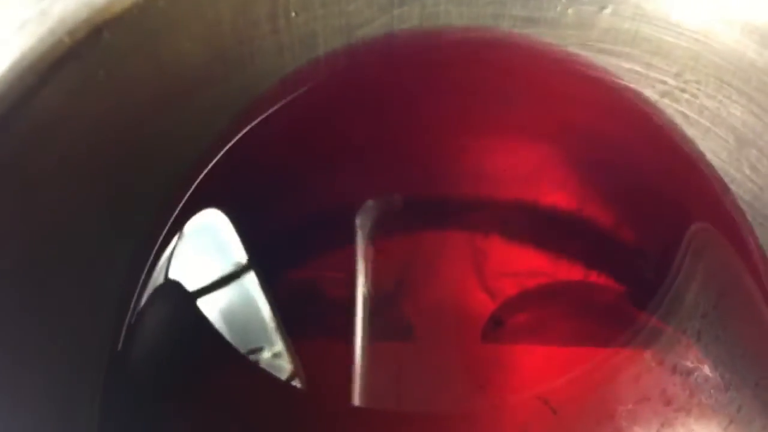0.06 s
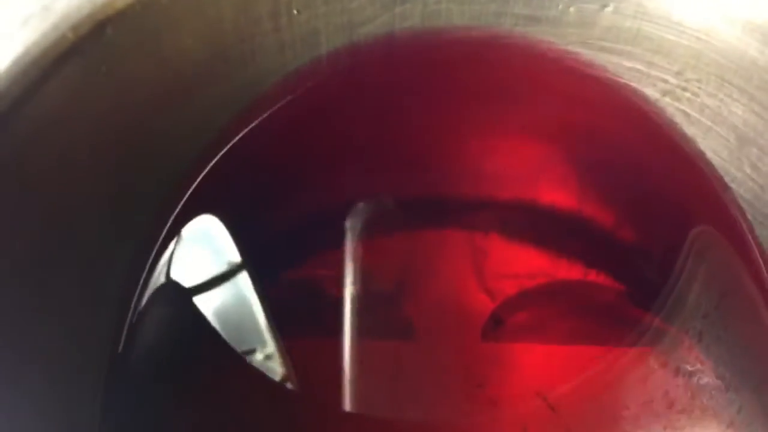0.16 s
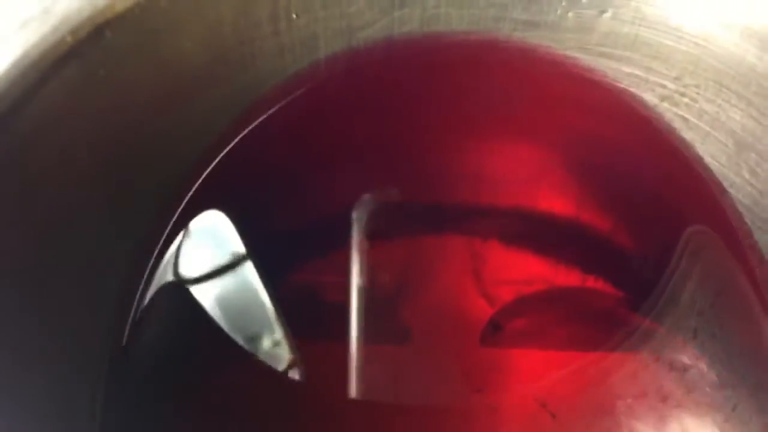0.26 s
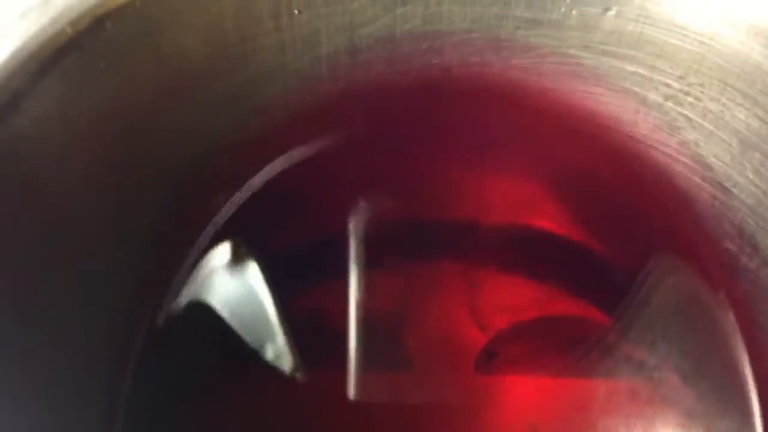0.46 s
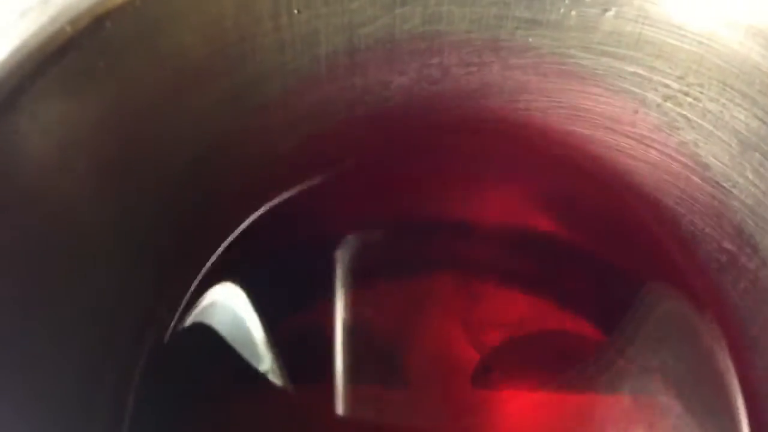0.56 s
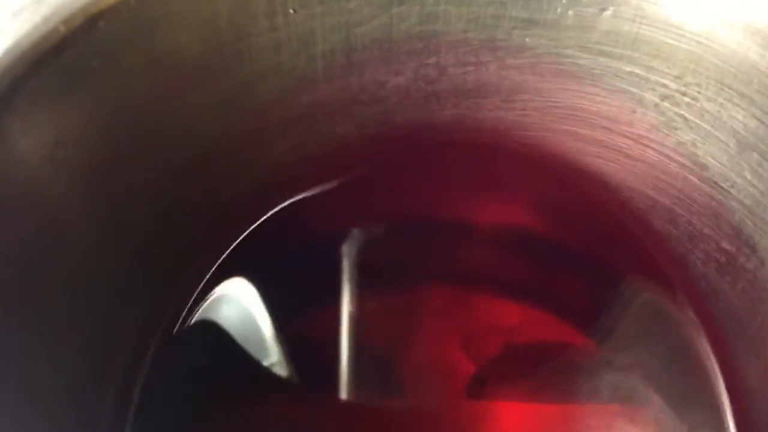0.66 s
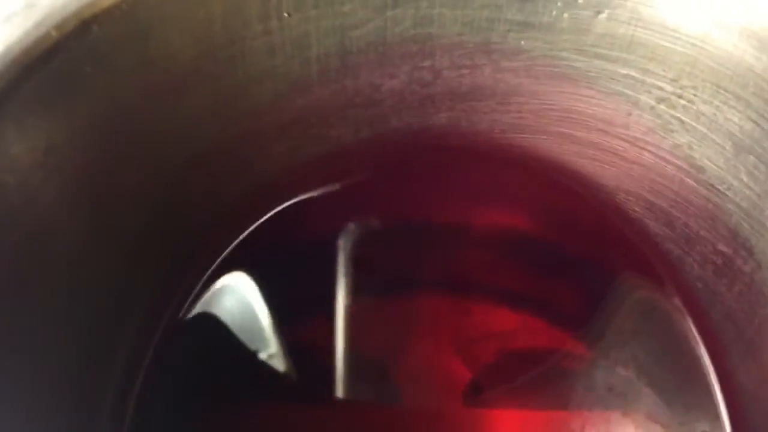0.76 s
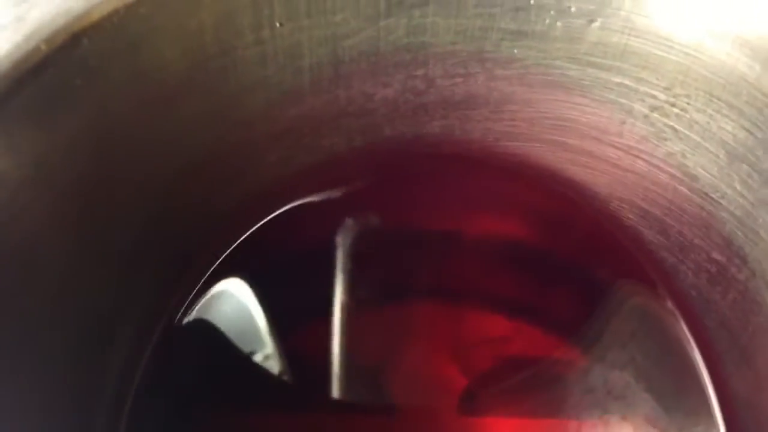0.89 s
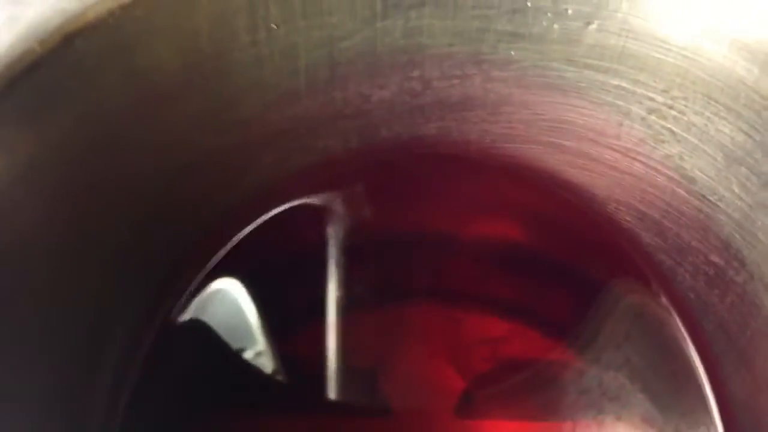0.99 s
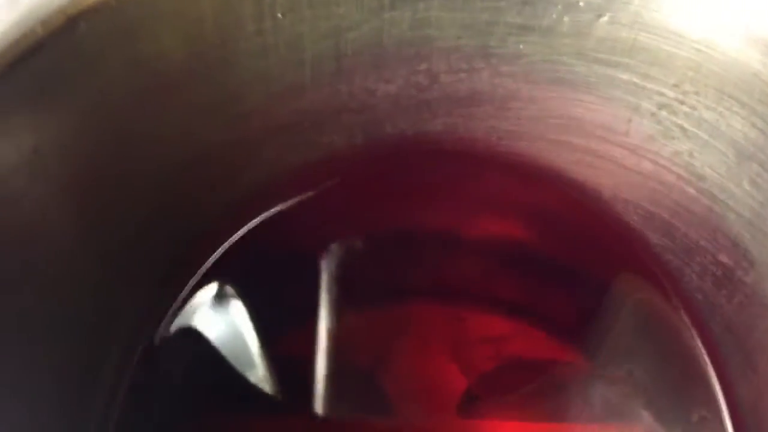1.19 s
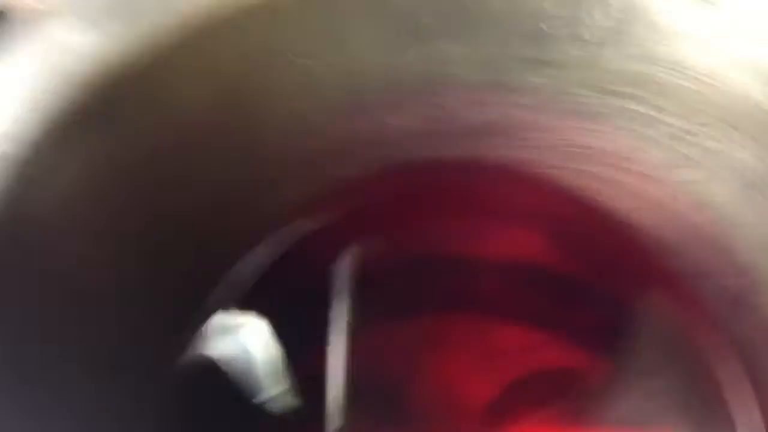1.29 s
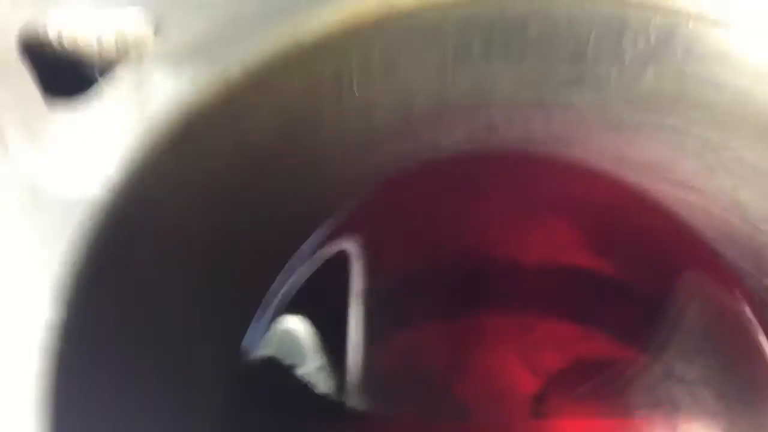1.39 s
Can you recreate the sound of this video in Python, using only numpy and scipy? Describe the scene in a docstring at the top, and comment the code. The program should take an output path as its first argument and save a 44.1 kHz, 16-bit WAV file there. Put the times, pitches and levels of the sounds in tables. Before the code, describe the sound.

A piston knocks and scrapes in an oiled metal cylinder, close up.

```python
"""A workshop, one microphone close above the bore of an oiled metal cylinder.
A piston is worked up and down: it rattles and knocks at each turn of the stroke, and the block thuds
on its support. Between the turns the rings scrape and hiss along the wall, and air squeaks and
bubbles through the oil. Behind it all lie a low rumble and a wavering hum."""
import sys
import numpy as np
from scipy import signal
from scipy.fft import rfft, irfft
from scipy.io import wavfile

SR = 44100
rng = np.random.default_rng(int(sys.argv[2]) if len(sys.argv) > 2 else 0)


def waveform_to_disk(signal):
    """Save audio, clipped to [-1, 1], as 16-bit WAV at the path in sys.argv[1]."""
    frames = np.transpose(np.atleast_2d(signal))
    scaled = np.clip(frames, -1, 1) * 32767
    samples = np.round(scaled).astype(np.int16)
    wavfile.write(sys.argv[1], SR, samples)


N = 63945
T = np.arange(N) / SR

# Piston blows and one hollow bubble pop in the oil (at 0.4685 s), close up:
# t/s, hollow body/dB, bore ring/dB, metal edge/dB, oily crunch/dB
KNOCKS_AND_POP = [(.164, -63, -55, -67, -57), (0.1753, -50, -49, -78, -48.5),
                  (0.1807, -52, -42.5, -78, -52.5), (.1945, -50.5, -52, -74, -48),
                  (.1995, -57, -53, -74, -43), (0.2156, -42.5, -52, -54, -55),
                  (0.2198, -20.5, -20.5, -36, -44), (.2293, -36, -41, -51, -56),
                  (0.233, -39, -36, -59, -58), (.2435, -39, -67, -80, -64), (.4685, -49, -58, -72, -64),
                  (.971, -85, -58, -64, -66), (1.0257, -68, -45.5, -49.5, -46.5),
                  (1.0305, -59, -58, -51, -55), (1.0363, -71, -35, -64, -49.5),
                  (1.0495, -78, -32.5, -54, -46), (1.0645, -68, -53, -72, -59),
                  (1.0745, -53.5, -46, -72, -45.5), (1.085, -64, -61, -63, -51.5),
                  (1.095, -67, -59, -82, -58)]
# Modes of body, bore and metal edge: f/Hz, relative level/dB, time to peak/s
BODY_MODES = [(650, -17, 0.00274), (908, 2, 0.002473), (1088, -11, 0.00395), (1560, -25, 0.0029),
              (2598, -10, 0.00307)]
BORE_MODES = [(1990, -16, 0.00306), (2162, -4, .0042), (2299, -6.5, 0.0043)]
EDGE_MODES = [(3210, -0.5, .0014), (3550, -0.5, 0.001328)]
# The block ringing on after body and bore are excited: f/Hz, relative level/dB, T60/s
BODY_TAIL = [(908, -29, .13), (1044, -35, .4), (1119, -28, .11), (1212, -37, .11), (1439, -46, .27),
             (1543, -49, .17), (2547, -31, .1), (2635, -35, .13), (8425, -50, .09)]
BORE_TAIL = [(1893, -36, .11), (2001, -35, .11), (2135, -26, .11), (2270, -33, .2)]
# Spectra of crushed oil film and of the tick of bare metal: f/Hz, relative density/dB
CRUNCH_SPECTRUM = [(20, -22), (400, -13.5), (650, 1), (800, -3.5), (1300, 2), (1650, -3.5), (1950, 2),
                   (2400, -10), (2700, -13), (3200, -11.5), (3700, -26), (4300, -24), (5800, -41),
                   (7000, -34), (16000, -45)]
TICK_SPECTRUM = [(20, -11), (3000, 6.5), (4500, -4), (5200, 7), (5500, -10), (5850, 2), (6300, -18),
                 (7200, -2), (7700, 4.5), (8200, -7.5), (10000, -14), (11000, -7), (11550, 3.5),
                 (12200, -10), (12900, -6), (13600, -11), (14500, -14), (16000, -21)]
def piston_knocks_and_pop():
    """Piston blows and one bubble pop sound body, bore and edge, with an oily crunch and a tick."""
    body = swelling(BODY_MODES) + amp(4) * lingering(BODY_TAIL)
    bore = swelling(BORE_MODES) + amp(4) * lingering(BORE_TAIL)
    edge = swelling(EDGE_MODES)
    crunch = colour(friction(), CRUNCH_SPECTRUM)
    tick = colour(rng.standard_normal(N), TICK_SPECTRUM)
    hardest_db = max(event[1] for event in KNOCKS_AND_POP)
    out = np.zeros(N)
    for start, body_db, bore_db, edge_db, crunch_db in KNOCKS_AND_POP:
        add(out, start, amp(body_db) * body + amp(bore_db) * bore + amp(edge_db) * edge)
        out += amp(crunch_db) * crunch * burst(start, rise_s=0.003, decay_s=0.0079)
        tick_db = -40.5 + 1.5 * (body_db - hardest_db)  # soft events barely tick
        out += amp(tick_db) * tick * burst(start, rise_s=0.00075, decay_s=0.0057)
    return out


# Course of ring scrape, upper bore resonance (strongest late in a stroke) and oil hiss: t/s, level/dB
SCRAPE_LEVELS = [(0, -90), (.32, -77), (.36, -63), (.39, -59), (.42, -54), (.5, -51.5), (.57, -50),
                 (.68, -50.5), (.75, -52.5), (.81, -55.5), (.845, -71), (.87, -88), (1.21, -80.5),
                 (1.243, -69), (1.26, -58), (1.32, -52.5), (1.37, -49), (1.45, -52)]
SING_LEVELS = [(.5, -100), (.6, -78), (.67, -57.5), (.76, -74), (.81, -56.5), (.87, -100), (1.22, -100),
               (1.28, -60), (1.45, -67)]
HISS_LEVELS = [(0, -100), (.33, -89), (.42, -71.5), (.5, -68), (.61, -66.5), (.7, -65.5), (.8, -74),
               (.86, -85), (1.24, -88), (1.27, -75), (1.295, -74.5), (1.328, -67.5), (1.35, -56),
               (1.385, -53), (1.402, -57.5), (1.435, -68), (1.447, -60.5)]
# Their spectra just above the bore: f/Hz, relative density/dB
SCRAPE_SPECTRUM = [(20, -45), (400, -44), (750, -24.5), (930, -22.5), (1200, -19.5), (1450, -30),
                   (1800, -19), (2030, -20.5), (2160, 1.5), (2300, -6.5), (2480, -19), (2700, -13.5),
                   (2900, -20.5), (3170, -13), (3750, -25), (4350, -25.5), (4600, -26), (5000, -46),
                   (5400, -31), (5880, -32), (6300, -41), (9000, -58), (20000, -64)]
SING_SPECTRUM = [(20, -74), (2800, -24), (3080, -10.5), (3170, -1), (3260, -31), (3600, -29), (20000, -83)]
HISS_SPECTRUM = [(20, -27), (350, 2), (700, -0.5), (1500, -18), (4000, -3), (5100, -6.5), (5900, -0.5),
                 (6700, -1), (7400, -1), (8000, -4.5), (8600, 0), (10600, -6.5), (11700, 2.5), (12600, -2),
                 (14000, 1.5), (16000, -6.5)]
# The rings catch and slip: t/s, gritty hiss/dB, bore ring/dB
CATCHES = [(.494, -78, -44.5), (.558, -78, -41), (0.602, -57, -52.5), (.662, -76, -47), (.69, -63, -71),
           (.819, -71, -74), (1.256, -78, -48.5), (1.267, -67, -56), (1.275, -75, -50), (1.307, -78, -44.5),
           (1.363, -66, -46), (1.383, -62, -56), (1.443, -62, -53)]
def piston_rings():
    """Sliding rings excite the bore, catching and slipping, while the oil film hisses."""
    judder = amp(1.05 * wander(rate_hz=23))
    scrape = colour(friction(), SCRAPE_SPECTRUM) * level(SCRAPE_LEVELS) * judder
    sing = colour(friction(), SING_SPECTRUM) * level(SING_LEVELS)
    grit, slips = np.zeros(N), np.zeros(N)
    for start, grit_db, bore_db in CATCHES:
        grit += amp(grit_db) * burst(start, rise_s=0.00075, decay_s=0.0036)
        add(slips, start, amp(bore_db) * ping(hz=2195, peak_s=0.0055))
    flicker = amp(1.1 * wander(rate_hz=50))
    hiss = colour(friction(), HISS_SPECTRUM) * (level(HISS_LEVELS) * flicker + grit)
    return scrape + sing + slips + hiss


# Thuds from under the cylinder: t/s, level/dB, f/Hz, overtone level/dB
BLOCK_THUDS = [(.001, -54.5, 74, -56.5), (.097, -52, 79.4, -53), (.222, -44, 66.4, -40),
               (.287, -43, 79.4, -56), (0.511, -63, 81, -55.5), (0.941, -44, 77, -59),
               (1.071, -40, 68, -44.5), (1.095, -64, 66.8, -43.5), (1.335, -50, 79, -48.5)]
def block_thuds():
    """The block rocks on its support: a low note with two overtones."""
    out, peak_s = np.zeros(N), 0.0189
    for start, db, hz, overtone_db in BLOCK_THUDS:
        overtones = ping(2.023 * hz, peak_s) + amp(-13) * ping(3 * hz, peak_s)
        add(out, start, amp(db) * ping(hz, peak_s) + amp(overtone_db) * overtones)
    return out


# Thin squeaks, one path of points each: t/s, f/Hz, level/dB, roughness/fraction of pitch
SQUEAK_PATHS = [
    [(.162, 2750, -70, 0.07), (.168, 2716, -64, 0), (.192, 2690, -80, .03)],
    [(.36, 1021, -80, 0.15), (.42, 980, -65, 0.05), (.51, 946, -67, 0.09), (.62, 890, -80, 0.18)],
    [(.385, 3640, -80, 0.08), (.402, 4150, -62, 0.01), (.422, 4230, -67, 0.02), (.442, 4130, -51.5, 0),
     (.453, 3500, -53, 0), (.468, 3200, -82, 0.16)],
    [(1.018, 5780, -80, 0.08), (1.028, 5680, -69, 0.03), (1.04, 5500, -83, 0)],
    [(1.405, 5500, -80, 0.18), (1.425, 4900, -65, 0.1), (1.438, 4250, -57, 0.1), (1.455, 3690, -55, 0.09)],
]
# Bubbles in the oil: t/s, level/dB, f/Hz
OIL_BUBBLES = [(.4695, -48.5, 489), (1.0345, -43.5, 650), (1.36, -56.5, 494)]
def air_through_oil():
    """Air squeezes past the rings in gliding squeaks and a few bubbles, and the air column in the bore sounds a
    slow falling tone as the piston descends."""
    out = np.zeros(N)
    for path in SQUEAK_PATHS:
        times, hz, db, roughness = np.transpose(path)
        rasp = np.interp(T, times, roughness) * wander(rate_hz=690)
        waver = 0.0071 * wander(rate_hz=250)
        pitch = np.interp(T, times, hz) * (1 + rasp + waver)
        envelope = np.interp(T, times, amp(db), left=0, right=0)
        out += np.sqrt(2) * envelope * tone(pitch)
    for start, db, hz in OIL_BUBBLES:
        add(out, start, amp(db) * ping(hz, peak_s=3.19 / hz))
    return out


# Room tone behind the cylinder: f/Hz, relative density/dB
RUMBLE_SPECTRUM = [(10, -41), (25, -24), (45, -11), (65, 2.5), (80, 2), (105, -3.5), (145, -2.5),
                   (200, -13.5), (250, -22), (400, -25.5), (620, -24), (800, -31.5), (2000, -35.5),
                   (5000, -40), (9500, -44), (10500, -48), (12000, -46), (16000, -49.5)]
def workshop():
    """The background is a low rumble with a wavering hum."""
    hum = unit(tone(hz=80.5 + 4 * wander(rate_hz=7.7)))
    rumble = colour(rng.standard_normal(N), RUMBLE_SPECTRUM)
    return amp(-54.5) * rumble + amp(-58.5) * hum


def room(x, tail_db=-14, t60_s=0.14, delay_s=0.007):
    """Nearby surfaces send a short, dense tail to the microphone after the direct sound."""
    t = T[:SR // 3]
    tail = rng.standard_normal(len(t)) * amp(-60 * t / t60_s) * (t > delay_s)
    return x + amp(tail_db) * signal.fftconvolve(x, tail / np.linalg.norm(tail))[:N]


def friction(slips_per_s=1800, spread_db=2, slip_share=0.34):
    """Tiny slips of uneven size over a smooth rub."""
    sizes = rng.standard_normal(N) * amp(spread_db * np.minimum(rng.exponential(1, N), 4))
    slips = sizes * (rng.random(N) < slips_per_s / SR)
    return np.sqrt(slip_share) * unit(slips) + np.sqrt(1 - slip_share) * rng.standard_normal(N)


def ping(hz, peak_s):
    """A damped resonance that swells to its peak and dies."""
    t = T[:SR // 4]
    age = t / peak_s
    return (age * np.exp(1 - age)) ** 2.05 * np.sin(2 * np.pi * hz * (t - peak_s))


def swelling(modes):
    """Modes excited together swell and die."""
    return sum(amp(db) * ping(hz, peak_s) for hz, db, peak_s in modes)


def lingering(modes):
    """Modes start at once and fade exponentially."""
    t = T[:SR // 4]
    return sum(amp(db - 60 * t / t60) * np.sin(2 * np.pi * hz * t) for hz, db, t60 in modes)


def burst(start, rise_s, decay_s):
    """An envelope that swells quickly and dies away."""
    t = np.maximum(T - start, 0)
    return (1 - np.exp(-t / rise_s)) * np.exp(-t / decay_s)


def colour(x, spectrum):
    """Filters x by a spectrum, at unit power."""
    hz, db = np.transpose(spectrum)
    gain = amp(np.interp(np.log(np.fft.rfftfreq(N, 1 / SR) + 1), np.log(hz), db))
    return unit(irfft(rfft(x) * gain, N))


def wander(rate_hz):
    """Smooth random drift of unit power."""
    lowpass = np.exp(-(np.fft.rfftfreq(N, 1 / SR) / rate_hz) ** 2)
    return unit(irfft(rfft(rng.standard_normal(N)) * lowpass, N))


def tone(hz):
    return np.sin(2 * np.pi * np.cumsum(hz) / SR)


def level(points):
    return amp(np.interp(T, *np.transpose(points)))


def amp(db):
    return 10 ** (np.asarray(db) / 20)


def unit(x):
    return x / np.sqrt(np.mean(x ** 2) + 1e-20)


def add(mix, start, sound):
    part = mix[max(round(start * SR), 0):][:len(sound)]
    part += sound[:len(part)]


def scene():
    """Piston, oil and workshop in mono, from close above the bore."""
    in_room = room(piston_knocks_and_pop() + air_through_oil())
    return (in_room + piston_rings() + block_thuds() + workshop())[None]


def record(dry, cutoff_hz=15750):
    """The microphone signal loses its highest treble."""
    lowpass = signal.firwin(511, cutoff_hz, window=("kaiser", 9), fs=SR)
    return signal.oaconvolve(dry, lowpass[None], "same")


dry = scene()
out = record(dry)
waveform_to_disk(out)
```